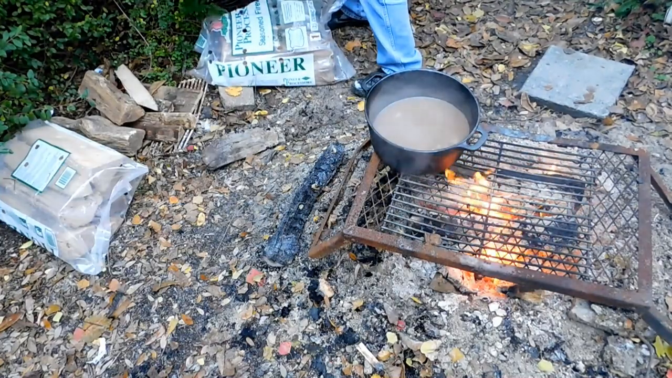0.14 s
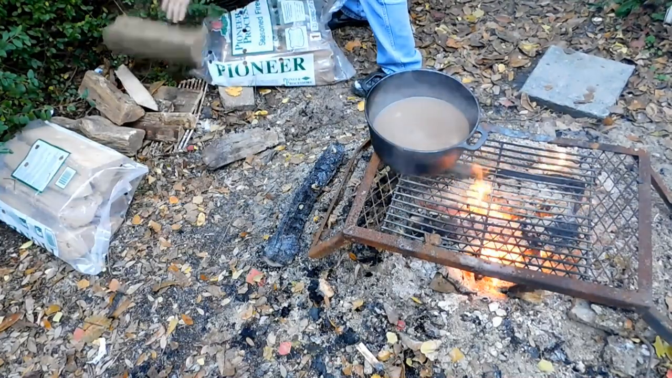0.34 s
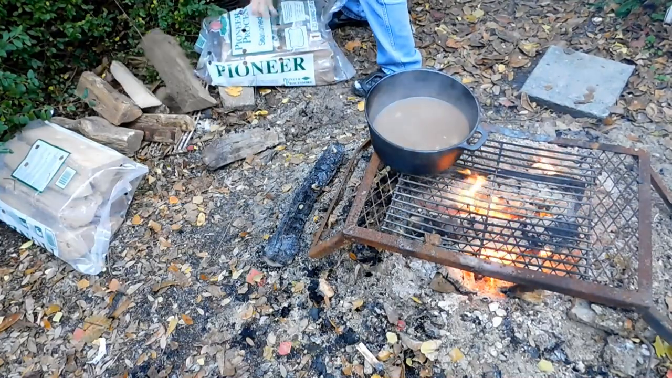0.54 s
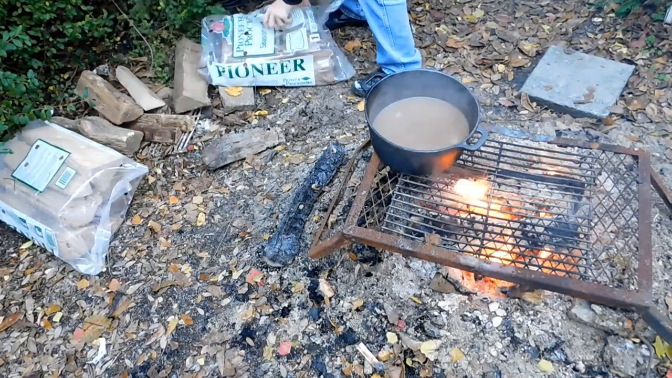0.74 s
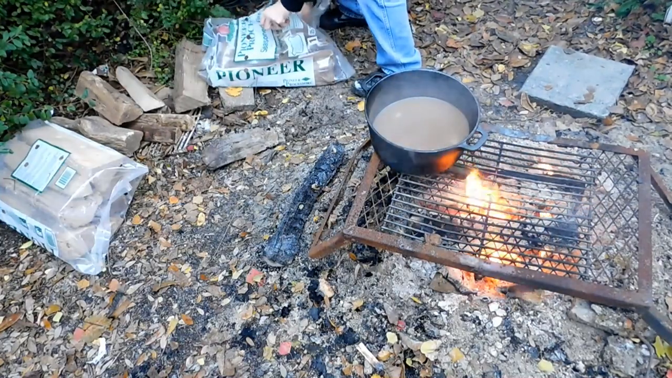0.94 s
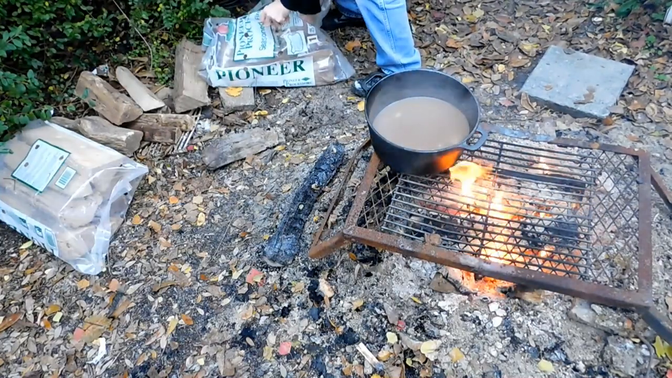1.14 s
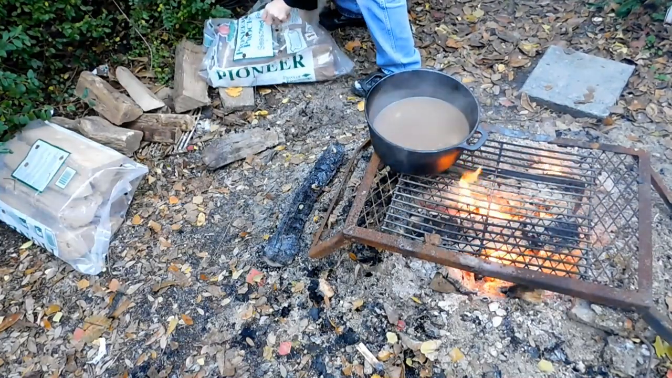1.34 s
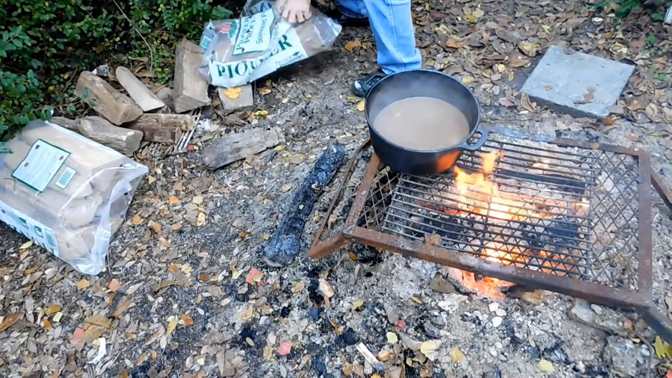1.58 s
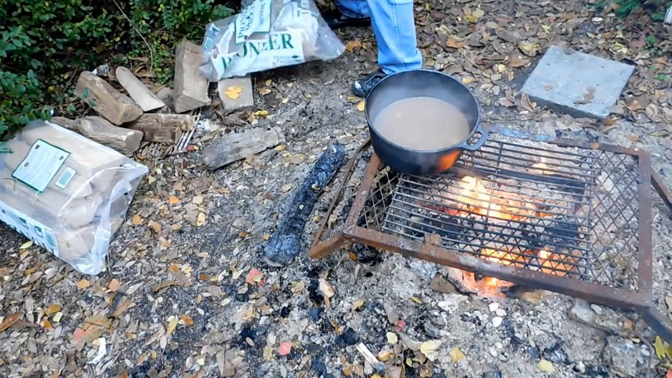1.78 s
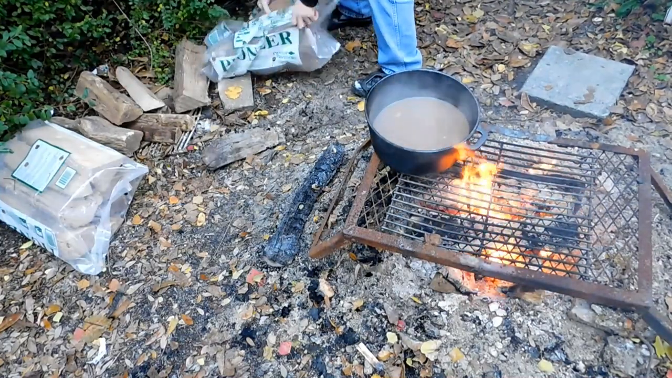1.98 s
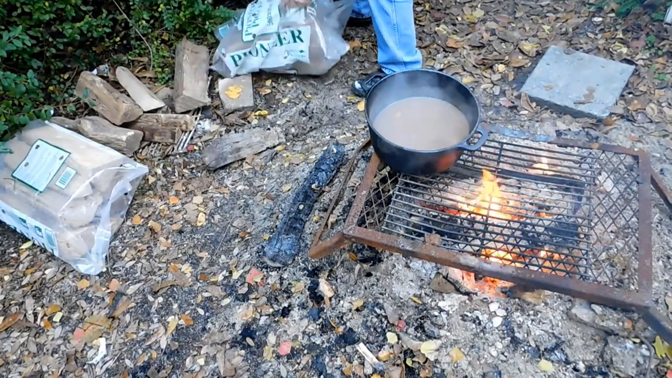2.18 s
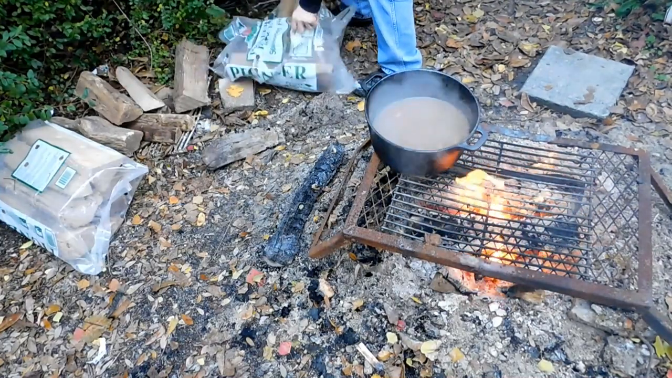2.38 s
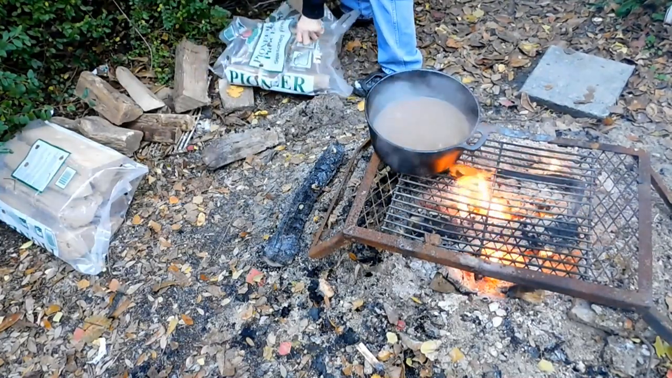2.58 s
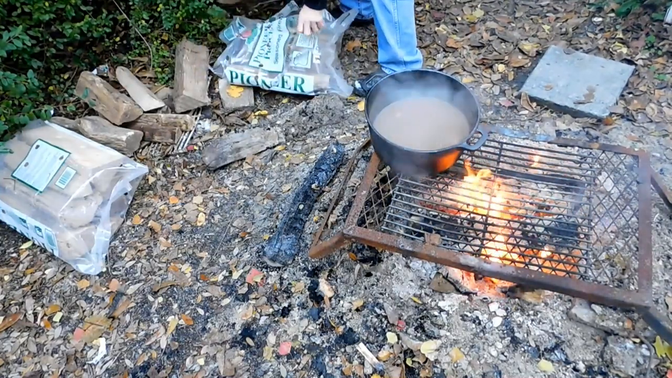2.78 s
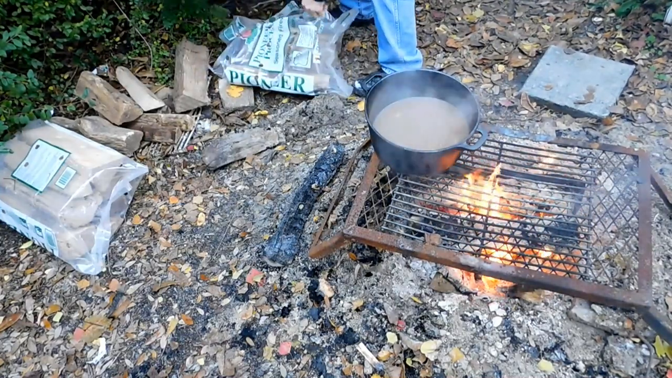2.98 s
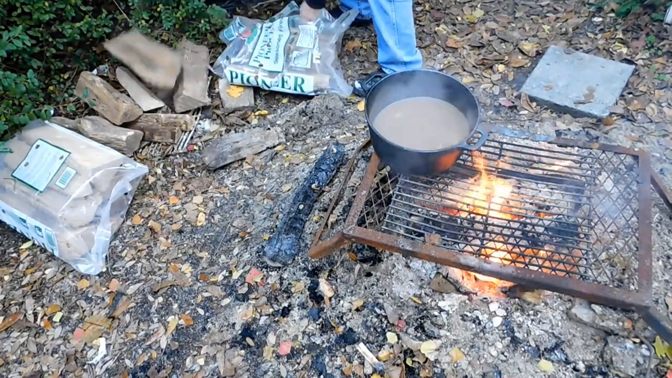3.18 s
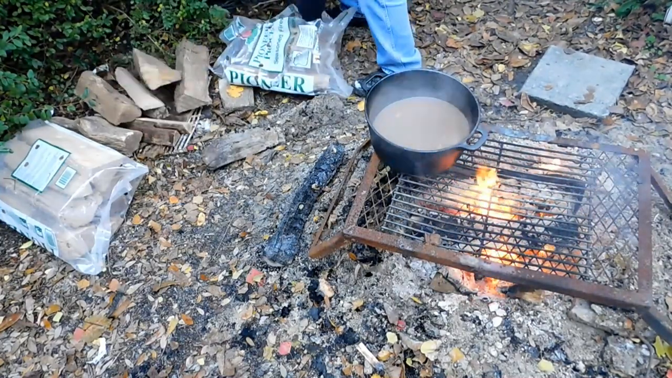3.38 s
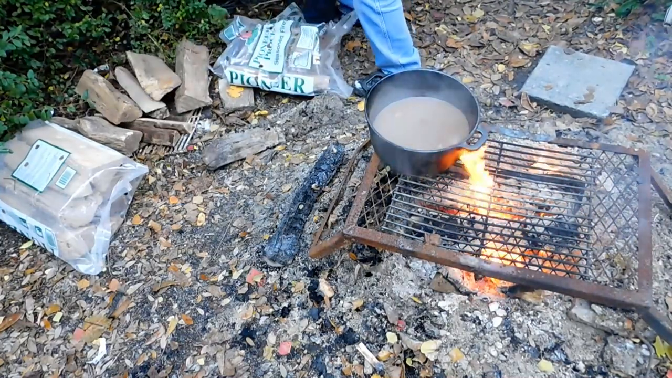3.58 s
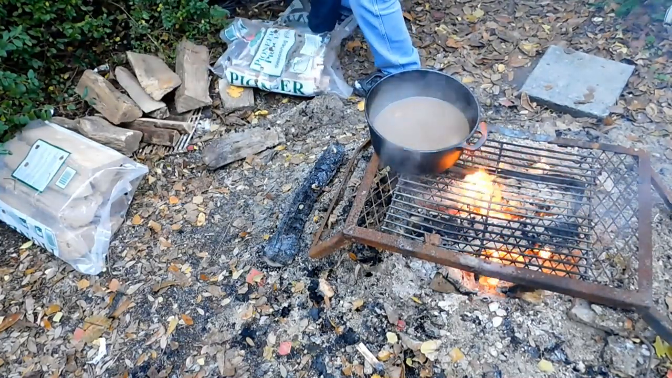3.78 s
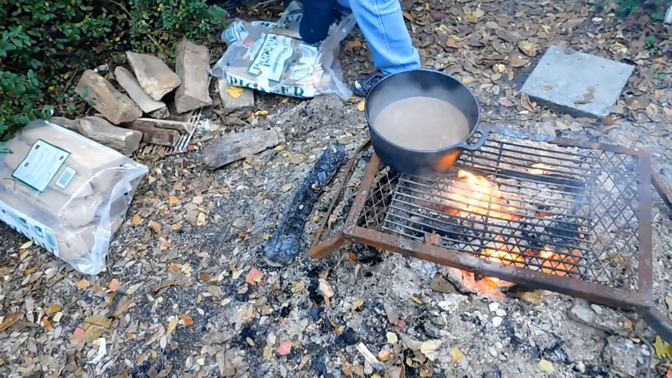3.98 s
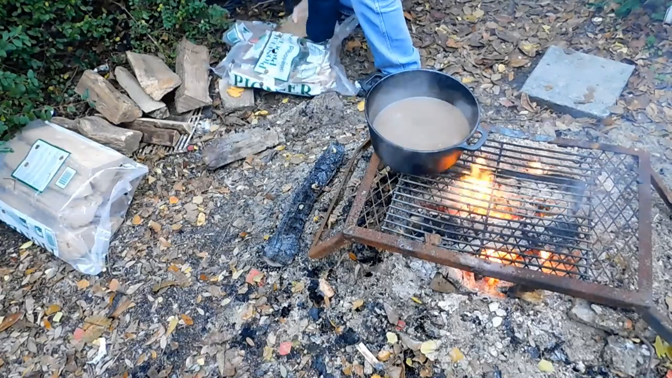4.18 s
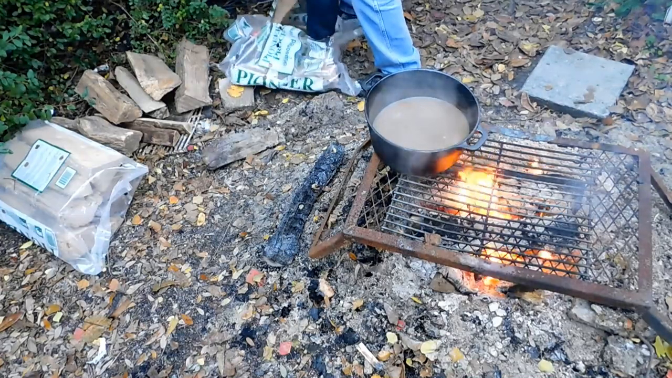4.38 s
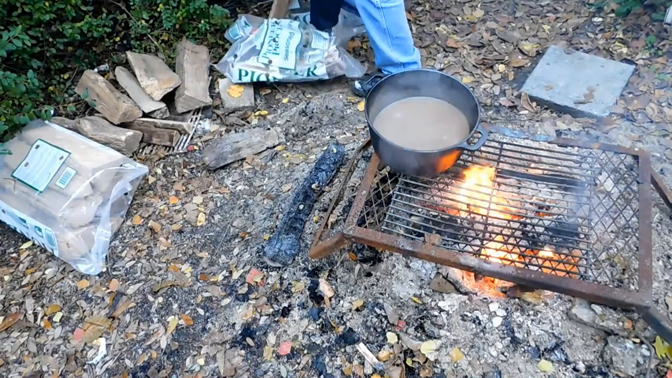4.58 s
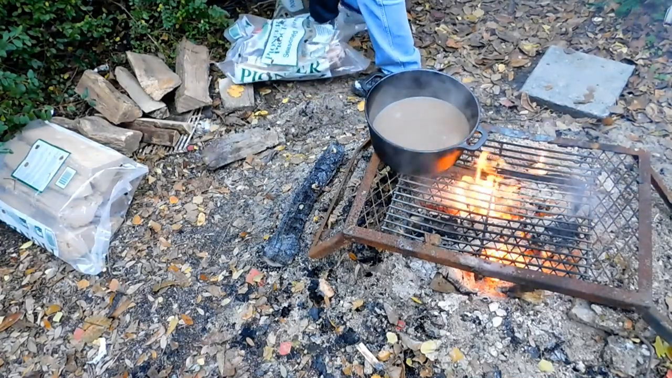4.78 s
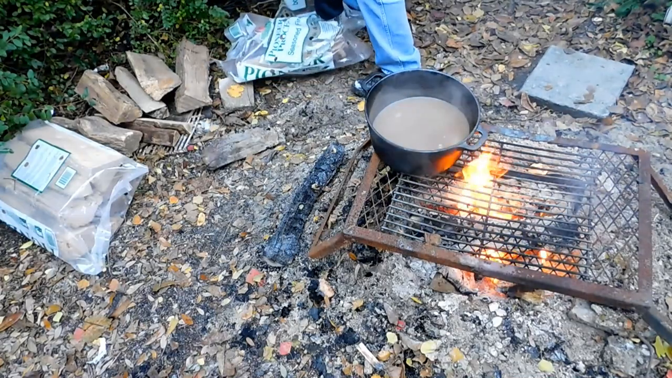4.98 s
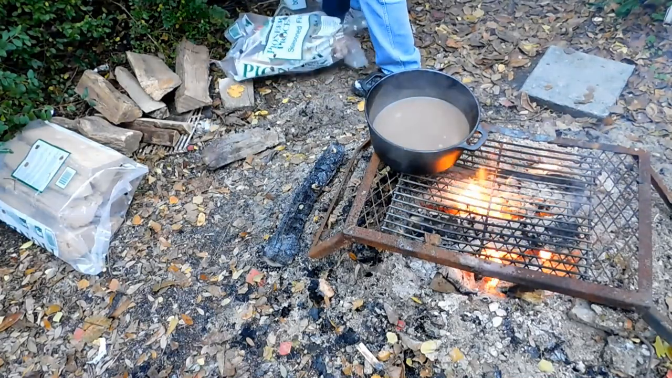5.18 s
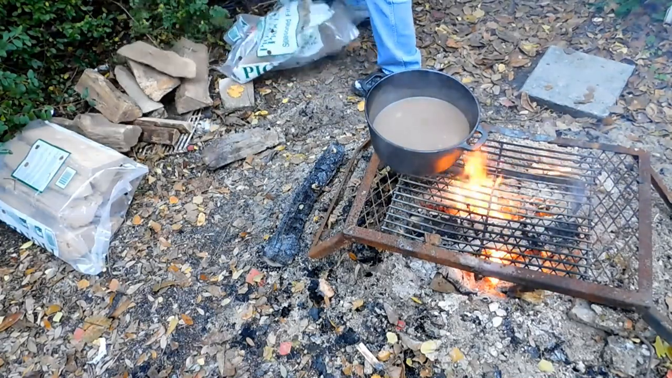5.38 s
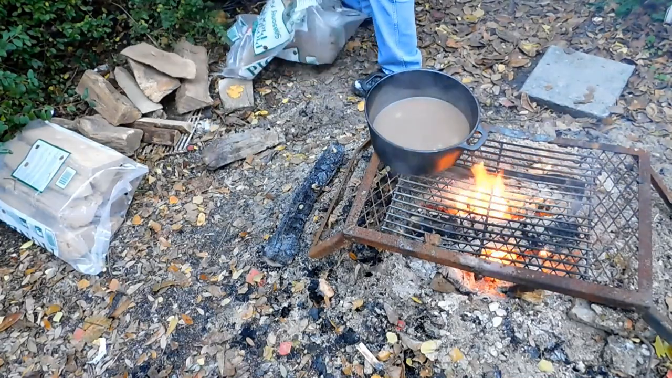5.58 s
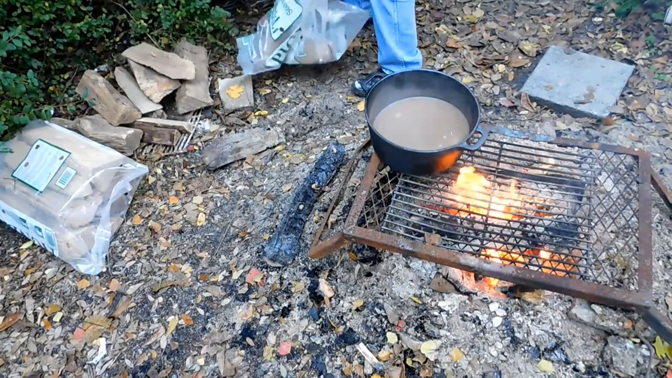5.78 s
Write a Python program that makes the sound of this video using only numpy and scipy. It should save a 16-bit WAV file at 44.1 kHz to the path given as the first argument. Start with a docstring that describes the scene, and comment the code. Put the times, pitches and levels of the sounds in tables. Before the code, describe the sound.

Split logs clack onto a small pile in three quick clusters outdoors, while a stiff plastic sack crackles and snaps between them.

```python
"""Split logs knock onto a small pile in a yard, while a stiff plastic sack is dragged, crackling and snapping.
Each log contact is a sum of struck wood modes with a noise crack, a rattle of the pile and a rocking tail.
The sack is random creases exciting resonances of its sheet, swelling with each tug, plus single snapping folds.
Low thumps lie under the sack and the log knocks. Behind are a faint fire, far traffic, a low wavering hum and
light wind, all made of shaped noise or tones and heard through a small two-port microphone."""
import sys
import numpy as np
from scipy import signal
from scipy.fft import rfft, irfft
from scipy.io import wavfile
from scipy.ndimage import uniform_filter1d

SR = 44100
rng = np.random.default_rng(int(sys.argv[2]) if len(sys.argv) > 2 else 0)


def master(y):
    """Save y as 16-bit WAV."""
    cut = np.clip(np.atleast_2d(y).T, -1, 1)
    pcm = np.round(cut * 32767)  # scale
    wavfile.write(sys.argv[1], SR, pcm.astype(np.int16))


def invert_db(level):
    """Linear amplitude ratio for a level in decibels (20 dB per decade), elementwise."""
    return 10 ** (np.asarray(level, dtype=float) / 20)


N = 257544
TIME = np.arange(N) / SR  # s

# spectrum of splintery clicks: freq_hz, level_db
CRACK_SPECTRUM = [(1500, -15.5), (4000, -1.5), (8000, -9), (13000, -14), (16000, -15)]
# side signal against mid signal at the two ports: freq_hz, level_db
SIDE_SPECTRUM = [(60, -26), (250, -31.5), (700, -13.5), (1400, -10), (3000, -4.5), (6000, -2),
                 (12000, -0.5)]


def unit(x):
    """Normalization by energy: scale to rms 1."""
    return x / np.sqrt(np.mean(x ** 2))


def response(points, size=2048):
    """Minimum-phase response: the folded cepstrum of a log gain is causal; points are (Hz, dB)."""
    hz, db = np.transpose(points)
    freq = np.maximum(np.arange(size // 2 + 1) * SR / size, 1)
    log_gain = np.interp(np.log(freq), np.log(hz), db) * np.log(10) / 20
    cepstrum = irfft(log_gain)
    cepstrum[1:size // 2] *= 2
    cepstrum[size // 2 + 1:] = 0
    return irfft(np.exp(rfft(cepstrum)))


def colour(x, points):
    """Linear filtering: convolve with the response of a spectrum."""
    return signal.fftconvolve(x, response(points))[:len(x)]


def walk(rate):
    """Low-pass random modulation: steps drawn rate times a second, smoothed twice, rms 1."""
    k = int(SR / rate)
    steps = np.repeat(rng.standard_normal(N // k + 1), k)
    smooth = uniform_filter1d(uniform_filter1d(steps, k), k)
    return unit(smooth[:N])


def ring(hz, t60, t):
    """Damped free vibration: a sine whose amplitude falls 60 dB in t60 seconds."""
    return np.sin(2 * np.pi * hz * t) * np.exp(-np.log(1000) * t / t60)


def burst(t, t60, points, lumpy_db=0.):
    """Impulsive noise: decaying and coloured, peak 1; lumpy when made of separate small taps."""
    taps = invert_db(lumpy_db * np.repeat(rng.standard_normal(len(t) // 64), 64))
    decay = np.exp(-np.log(1000) * t / t60)
    x = colour(taps * rng.standard_normal(len(t)) * decay, points)
    return x / np.abs(x).max()


def pair(mid, side, points):
    """Mid/side stereo: the coloured side signal enters the two ports with opposite sign."""
    return mid + colour(side, points) * np.array([[1], [-1]])


def add(out, s, x):
    """Superposition: place a sound at s seconds."""
    i = int(s * SR)
    x = x[..., :N - i]
    out[:, i:i + x.shape[-1]] += x


def swell(s, db, fall_s, rise):
    """Exponential growth and decay: db at s seconds, falling 20 dB per fall_s, rising in rise times that."""
    round_top = 0.07  # share of the fall time over which the peak is rounded
    late = (TIME - s) / fall_s
    away = np.maximum(late, -late / rise)
    return invert_db(db - 20 * (np.hypot(away, round_top) - round_top))


def logs():
    """Modal impact: each contact excites the log's modes, mostly near its brightest ring, and shakes the pile."""
    # log contacts: start_s, body_peak_db, brightest_hz, crack_db (against the body)
    knocks = [(0.4673, 0, 1690, -16.5), (0.4694, -2, 747, -14.5), (.479, -3.5, 835, -36),
              (.495, -8.5, 900, -17), (.514, -1, 1460, -61.5), (.537, -11.5, 1010, -34.5),
              (.549, -16, 900, -29), (.594, -20, 794, -31), (.600, -15, 1670, -29.5),
              (.676, -16.5, 1400, -26.5), (0.7131, -4, 2350, -15), (3.2745, -4, 750, -9),
              (3.278, 0.5, 1010, -29), (3.292, -3, 1520, -19), (3.303, -17, 1020, -26),
              (3.319, -16, 1220, -29), (3.456, -20, 1100, -20), (3.521, -17, 785, -13),
              (5.390, -3.5, 1400, -34), (5.404, -2, 1800, -21.5), (5.426, -12, 890, -17.5),
              (5.445, -14, 1260, -17), (5.466, -17.5, 1323, -26), (5.551, -23, 1127, -16)]
    # modes of a split log: freq_hz, level_db, t60_s
    modes = [(265, -13, 0.095), (504, -21, 0.05), (610, -1, 0.02), (803, 1.5, 0.026), (908, 7, 0.028),
             (1100, 6, 0.016), (1307, 3.5, 0.019), (1401, -1.5, 0.029), (1652, 3.5, 0.01493),
             (2000, -4.5, 0.036), (2300, 1.5, 0.017), (2500, 4, 0.0067), (2930, -17, 0.0046)]
    # rattle of the logs underneath: freq_hz, level_db
    pile = [(120, -24), (250, -10.5), (450, -5.5), (800, 5.5), (950, 3.5), (1400, 0.5), (2300, -6.5),
            (3500, -17.5), (6000, -32), (14000, -35)]
    out, t = np.zeros((2, N)), np.arange(8192) / SR
    hz, db, t60 = np.transpose(modes)[:, :, None]
    for s, peak_db, bright_hz, crack_db in knocks:
        # every piece differs a little in size and in where it is struck
        chance = rng.standard_normal((2, len(modes), 1))
        octaves_away = np.abs(np.log2(hz / bright_hz))
        weight = invert_db(2 * chance[0]) * invert_db(db - 11 * octaves_away)
        body = np.sum(weight * ring(hz * (1 + .02 * chance[1]), t60, t), axis=0)
        body *= 1 - np.exp(-t / 0.0006)  # the push takes a moment
        crack = pair(burst(t, 0.012, CRACK_SPECTRUM), burst(t, 0.024, CRACK_SPECTRUM), SIDE_SPECTRUM)
        clack = pair(burst(t, 0.034, pile), burst(t, 0.018, pile), SIDE_SPECTRUM)
        # neighbouring pieces shift and tap one another for a moment
        rattle_mid = burst(t, 0.16, pile, lumpy_db=4.0)
        rattle_side = burst(t, 0.22, pile, lumpy_db=2.0)
        rattle = pair(rattle_mid, rattle_side, SIDE_SPECTRUM) * (1 - np.exp(-t / 0.005))
        # the log rocks as it settles and keeps its own modes sounding
        rocking = signal.fftconvolve(burst(t, 0.13, pile, lumpy_db=4.), body)[:len(t)]
        knock = body / np.abs(body).max()
        knock = knock + invert_db(-10.0) * clack + invert_db(-10) * rattle
        knock = knock + invert_db(-15) * rocking / np.abs(rocking).max()
        add(out, s, invert_db(peak_db) * (knock + invert_db(crack_db) * crack))
    return out


def crackle(per_s, spread_db):
    """Poisson-like impulses: random creases giving way, a few far larger than the rest, rms 1."""
    sizes = invert_db(spread_db * np.minimum(rng.exponential(size=N), 4))
    return unit((rng.random(N) < per_s / SR) * rng.standard_normal(N) * sizes)


def sheet_rings(rings, shared, per_s, share, slide):
    """Forced resonance: own creases, creases shared by the whole sack and sliding set off each ring."""
    out = 0
    for hz, db, width in rings:
        b, a = signal.iirpeak(hz, hz / width, fs=SR)
        flutter = invert_db(2 * walk(60))  # each part of the sheet tightens and slackens alone
        own = crackle(per_s, 3.2)
        kicks = own + share * shared + slide * rng.standard_normal(N)
        rung = signal.lfilter(b, a, signal.lfilter(b, a, kicks * flutter))
        out = out + invert_db(db) * unit(rung)
    return unit(out)


def sack():
    """Crackling noise: creases excite rings of the sheet, over low thumps under the sack and the log knocks."""
    # swells, mostly tugs: strongest_s, crackle_db, fall_s (by 20 dB),
    # fine_db and thump_db (both against the crackle)
    tugs = [(0.657, -36.5, 0.14, -3.5, -7.5), (.72, -35.5, 0.081, -5, -13.5), (0.906, -39.5, 0.21, -9, -10),
            (1.155, -49.5, 0.23, -6, -17.5), (1.315, -55.5, 0.123, -11, -23.5),
            (1.40, -46, 0.084, -8.5, -20), (1.466, -38.5, 0.091, -8, -25),
            (1.572, -32.5, 0.1693, -8.5, -21.5), (1.73, -37, 0.072, -7.5, -25),
            (1.798, -31.5, 0.16, -6.5, -16), (1.99, -33.5, 0.15, -8.5, -18), (2.04, -30.5, 0.19, -9.5, -21),
            (2.22, -33, 0.16, -6, -17), (2.285, -32.5, .15, -7, -15), (2.406, -27, 0.099, -14.5, -18.5),
            (2.508, -32.5, 0.097, -13, -13), (2.685, -50, 0.092, -5.5, -16), (3.362, -39, 0.13, -8, -6),
            (3.462, -37, 0.109, -6, -6), (3.532, -37, 0.026, -13, -5), (3.771, -43.5, 0.089, -23.5, -4),
            (3.945, -57.5, 0.05, -30, 5), (4.092, -40, 0.59, -9.5, -11), (4.394, -34.5, 0.12, -14.5, -10.5),
            (4.502, -36.5, .25, -10, -9), (4.70, -48, .12, -4, -6), (4.841, -41, .18, -21, -24),
            (4.97, -46, 0.18, -12.5, -15), (5.086, -45.5, 0.084, -9.5, -18),
            (5.291, -39.5, 0.12, -14, -9.5), (5.377, -39.5, 0.15, -12, -24.5), (5.47, -40, 0.2, -6, -8),
            (5.555, -35, .15, -8, -12), (5.63, -41, .12, -8, -19), (5.72, -40, .2, -14, -29),
            (5.832, -38.5, 0.28, -7.5, -25)]
    # rings of the sheet: freq_hz, level_db, width_hz (of each of two filter passes)
    body_rings = [(490, -10, 624), (750, -3.5, 660), (1068, 2, 800), (1400, -2, 470), (1870, 3.5, 820),
                  (2350, 2, 1050), (2860, -6.5, 970), (3530, -9.5, 950)]
    # finer creases: freq_hz, level_db, width_hz (of each of two filter passes)
    treble_rings = [(4000, 8, 4400), (6100, -5, 4500), (7400, 1, 3900), (10100, 0, 5280), (13100, -1, 7900)]
    # low thumps under the sack and the log knocks: freq_hz, level_db
    thump_spectrum = [(60, -22), (120, -4), (300, 1), (500, 4.5), (800, -40.5)]
    # a swell builds up in 0.78 of the time it takes to die away
    pulls = np.array([swell(s, db, fall_s, 0.78) for s, db, fall_s, _, _ in tugs])
    shares = invert_db(np.array([[0, fine_db, thump_db] for *_, fine_db, thump_db in tugs]))
    # swells add by power, and the pull is uneven
    gains = np.sqrt(shares.T ** 2 @ pulls ** 2) * invert_db(2 * walk(90))
    creases = crackle(700., 2.4)
    channels = []
    for _ in range(2):
        body = sheet_rings(body_rings, creases, per_s=280., share=0.97, slide=.8)
        treble = sheet_rings(treble_rings, creases, per_s=610.0, share=1.0, slide=1.2)
        thump = unit(colour(crackle(900., 1.5) + 0.3 * creases, thump_spectrum))
        channels.append(gains[0] * body + gains[1] * treble + gains[2] * thump)
    mid, side = channels
    return pair(mid, side - 0.13 * mid, SIDE_SPECTRUM)


def snaps():
    """Snap-through buckling: a fold flips over with a click and a very short ring of the sheet."""
    # single folds: start_s, ring_peak_db, ring_hz, click_db (not relative to the ring)
    folds = [(0.1643, -36.5, 2470, -38), (0.651, -42, 2170, -32), (0.8882, -20.5, 2000, -16.5),
             (0.896, -24, 3340, -27), (0.9157, -22, 1300, -45), (1.1323, -33, 2140, -50),
             (1.1654, -29, 2300, -47.5), (1.4528, -20, 1740, -39.5), (1.466, -11.5, 2400, -16.5),
             (1.5426, -29, 1110, -19), (1.5593, -20, 2410, -26), (1.6504, -23.5, 2380, -36),
             (1.72, -29, 1360, -28), (1.8514, -10.5, 2310, -9), (1.9799, -16, 900, -13),
             (2.0016, -21, 2350, -30), (2.0324, -11.5, 3300, -16), (2.0451, -16, 3180, -20),
             (2.2173, -18.5, 2572, -26), (2.274, -25, 1290, -14.5), (2.3843, -14.5, 2460, -17.5),
             (2.408, -15, 1050, -33), (2.464, -18, 1780, -19.5), (2.4717, -18, 1644, -26),
             (2.503, -27, 2080, -28), (2.5527, -24, 1400, -42), (3.753, -34, 1920, -40.5),
             (4.003, -36, 2400, -33), (4.1535, -23.5, 2190, -29), (4.254, -39.5, 1370, -28),
             (4.381, -26, 1560, -42), (4.683, -27.5, 1170, -40), (4.703, -24, 1750, -44),
             (4.8143, -20.5, 2350, -55), (4.877, -27, 2300, -30.5), (4.944, -26.5, 2500, -37),
             (5.0258, -28.5, 2467, -44), (5.101, -26.5, 2230, -31), (5.21, -28, 1790, -46),
             (5.3167, -29, 2500, -20.5), (5.3655, -28, 1440, -47), (5.5311, -23, 1140, -26),
             (5.548, -18, 2240, -27), (5.584, -22.5, 2220, -26.5), (5.6871, -19, 1840, -42),
             (5.7373, -16, 2310, -24), (5.776, -22.5, 1580, -45), (5.8303, -14.5, 1930, -17.5)]
    out, t = np.zeros((2, N)), np.arange(1024) / SR
    for s, peak_db, hz, treble_db in folds:
        sheet = ring(hz, 0.0094, t) + .5 * ring(1.403 * hz, 0.0084, t) + 0.09 * ring(hz, 0.034, t)
        click = pair(burst(t, 0.0066, CRACK_SPECTRUM), burst(t, 0.0046, CRACK_SPECTRUM), SIDE_SPECTRUM)
        add(out, s, invert_db(peak_db) * sheet / np.abs(sheet).max() + invert_db(treble_db) * click)
    return out


def fire():
    """Random impulses over noise: a small fire nearby ticks faintly, and its hiss comes and goes."""
    flicker = invert_db(4 * walk(14.1))
    mid, side = (unit(colour(crackle(63.0, 2.5) + 0.89 * rng.standard_normal(N), CRACK_SPECTRUM))
                 for _ in range(2))
    return invert_db(-70.5) * flicker * pair(mid, side, SIDE_SPECTRUM)


def yard(x, t60, wet_db):
    """Diffuse reflection: fences, walls and ground return a scattered tail, different at each port."""
    # echo colour: freq_hz, level_db
    echo_spectrum = [(150, -10.5), (500, -1.5), (900, -3), (1500, -6.5), (2500, -17.5), (5000, -7.5),
                     (14000, -2)]
    t = np.arange(int(.4 * SR)) / SR
    shape = np.exp(-np.log(1000) * t / t60) * (1 - np.exp(-t / 0.0076))
    uneven = invert_db(1.5 * walk(145)[:len(t)])
    tail = unit(colour(rng.standard_normal(len(t)) * uneven, echo_spectrum)) * shape
    side = colour(rng.standard_normal(len(t)) * shape, echo_spectrum)
    equal_energy = np.sqrt(np.sum(tail ** 2) / np.sum(side ** 2))
    side = colour(side * equal_energy, SIDE_SPECTRUM)
    return invert_db(wet_db) * np.array([signal.fftconvolve(x, tail + k * side)[:N] for k in (1, -1)])


def ports(x):
    """Directivity: the right port faces the work and hears more treble."""
    # left port minus right port: freq_hz, difference_db
    left_bias = [(110, 0.2), (1000, -0.6), (3000, -1.88), (8000, -1), (14000, -5)]
    # half of the difference goes to each port, with opposite sign
    return np.array([colour(v, [(hz, k * db / 2) for hz, db in left_bias]) for v, k in zip(x, (1, -1))])


def town():
    """Filtered noise: far traffic and hiss, partly different at the two ports."""
    # relative spectral density: freq_hz, level_db (per Hz)
    spectrum = [(20, -15), (40, -16), (70, -17), (130, -22.5), (250, -23.5), (420, -25), (714, -21),
                (1440, -23.5), (2400, -34), (3620, -44.5), (8000, -52), (14000, -45.5), (16000, -60)]
    # side against mid: freq_hz, level_db
    side_spectrum = [(20, -16), (70, -20.5), (250, -14), (1000, -6.5), (3000, 0.5), (12000, 0.5)]
    mid = unit(colour(rng.standard_normal(N), spectrum))
    side = unit(colour(rng.standard_normal(N), spectrum))
    return invert_db(-53 + 0.52 * walk(1)) * pair(mid, side, side_spectrum)


def hum():
    """Frequency and amplitude modulation: a distant low tone wavers around 95 Hz."""
    # course of the level before a random waver: time_s, rms_db
    course = [(0.0, -63), (1.01, -58.5), (1.72, -66), (2.4, -51), (3.15, -54.5), (3.4, -61), (4.1, -68),
              (4.73, -58), (5.0, -73), (5.84, -69.5)]
    s, db = np.transpose(course)
    phase = 2 * np.pi * np.cumsum(95 + 0.91 * walk(2.8)) / SR
    return np.sqrt(2) * invert_db(np.interp(TIME, s, db) + 0.99 * walk(13)) * np.sin(phase)


def wind():
    """Turbulent pressure: low-frequency noise, mostly separate at each port, swells in gusts over a breeze."""
    # gusts before the port gains: peak_s, level_db, fall_s (by 20 dB; symmetric, so its sign is immaterial)
    gusts = [(.94, -49, 0.27), (2.03, -62, .6), (2.75, -54, -0.8), (3.56, -54, 0.4), (4.3, -43, 0.2),
             (4.6, -52, .5), (4.86, -44, -0.5)]
    gain = invert_db(-73) + sum(swell(s, db, fall_s, 1.0) for s, db, fall_s in gusts)
    low = signal.butter(4, [22, 66], "bandpass", fs=SR, output="sos")
    noise = unit(signal.sosfilt(low, rng.standard_normal((2, N))))
    port_gains = np.array([[.5], [.7]])
    return gain * (noise + 0.15 * noise[::-1]) * port_gains


def scene():
    """Superposition: wood, sack and fire near the microphone, echoes of wood and sack, and the background."""
    wood, bag = logs(), snaps() + sack()
    echo = yard(wood.mean(0), t60=0.34, wet_db=-40.5) + yard(bag.mean(0), t60=0.32, wet_db=-42.5)
    return ports(wood + bag + echo + fire()) + town() + hum() + wind()


def roll_off(x):
    """The treble ends steeply here."""
    return signal.sosfilt(signal.butter(12, 16960, fs=SR, output="sos"), x)


def record(dry):
    """Band limiting: peaks beyond full scale are clipped and the top is cut above 15800 Hz."""
    cut = signal.ellip(6, .3, 25, 15800, fs=SR, output="sos")
    mix = signal.sosfilt(cut, np.clip(dry, -1, 1))
    return roll_off(mix)


dry = scene()
out = record(dry)
master(out)
```